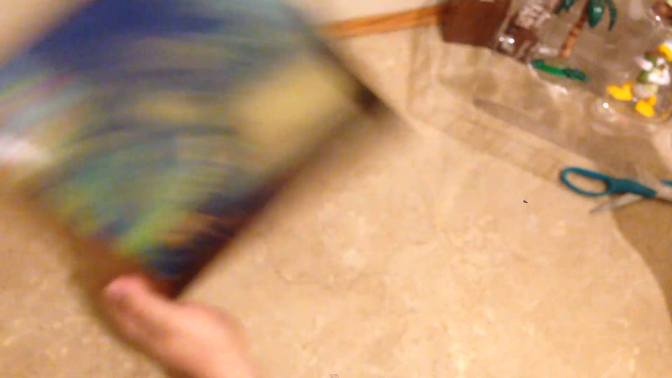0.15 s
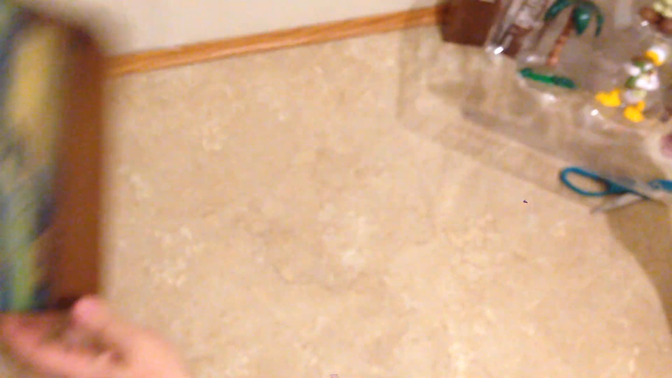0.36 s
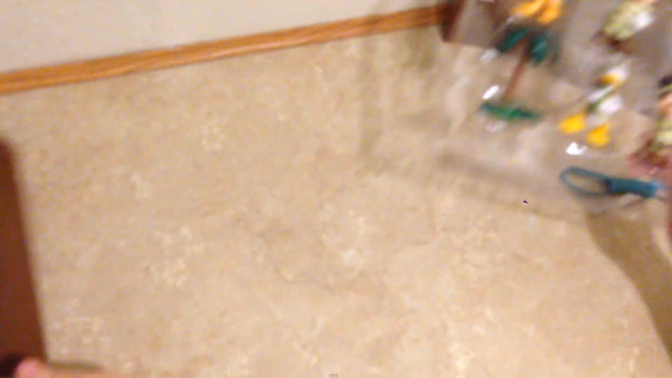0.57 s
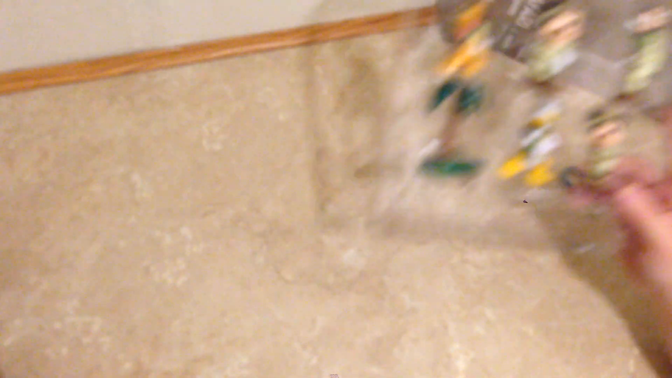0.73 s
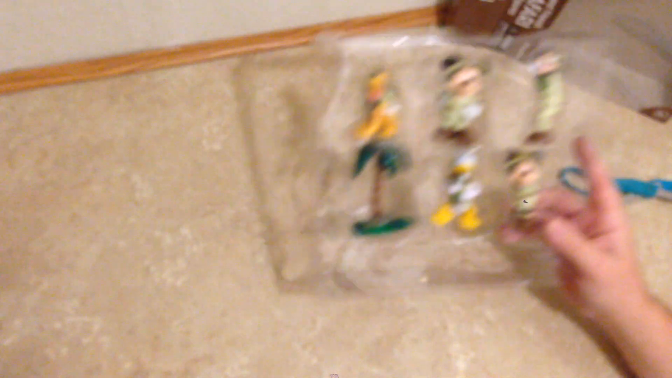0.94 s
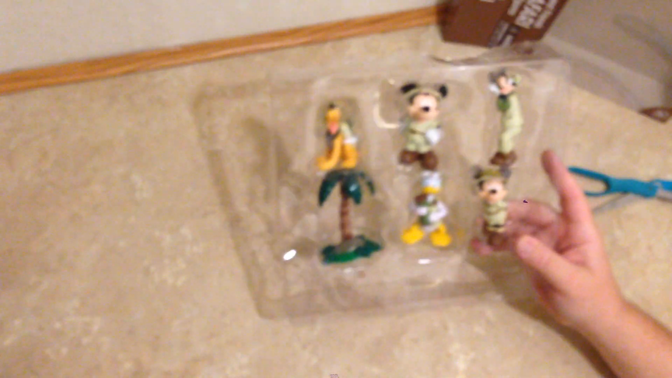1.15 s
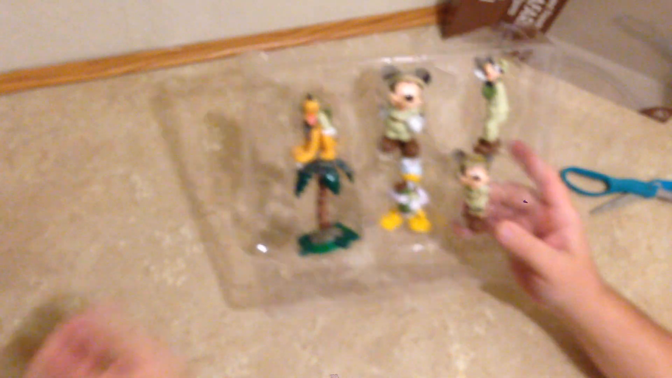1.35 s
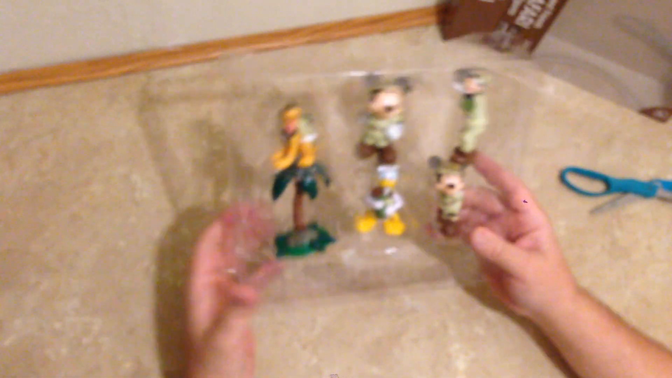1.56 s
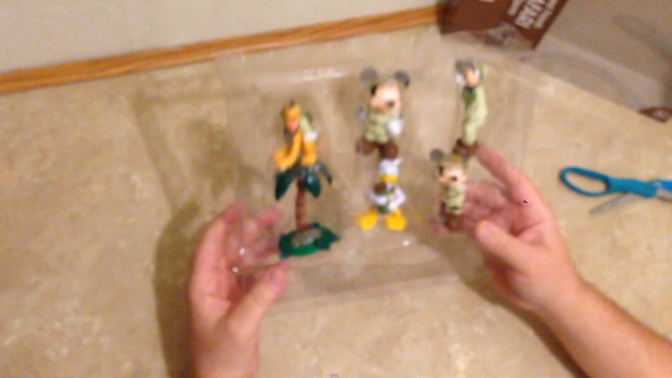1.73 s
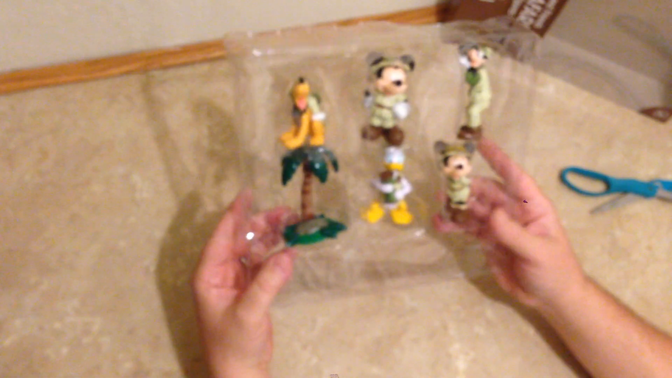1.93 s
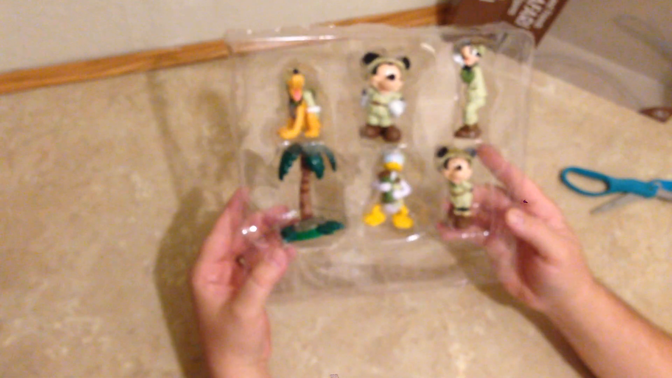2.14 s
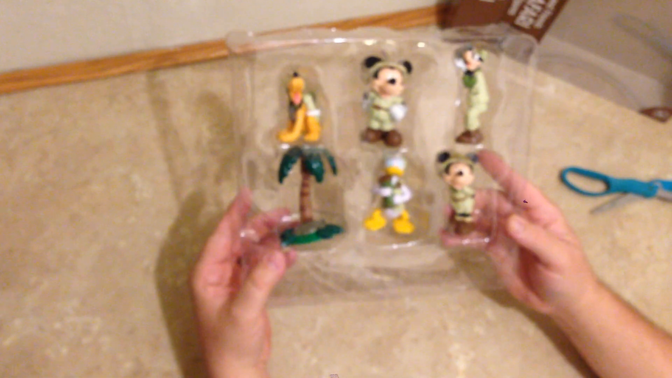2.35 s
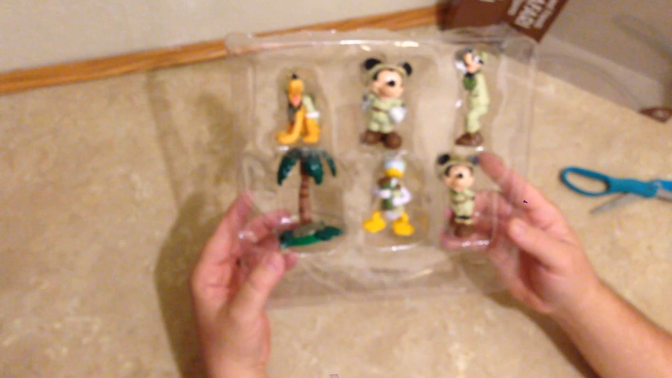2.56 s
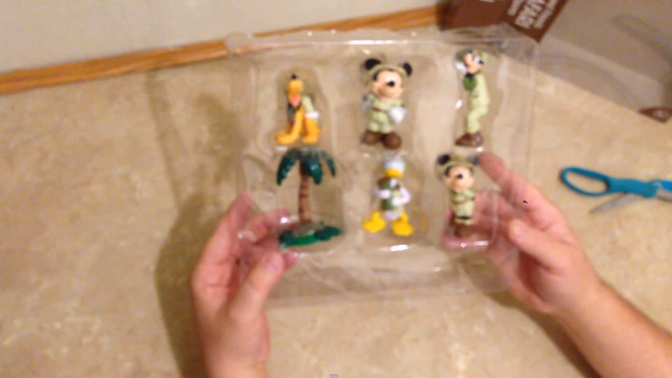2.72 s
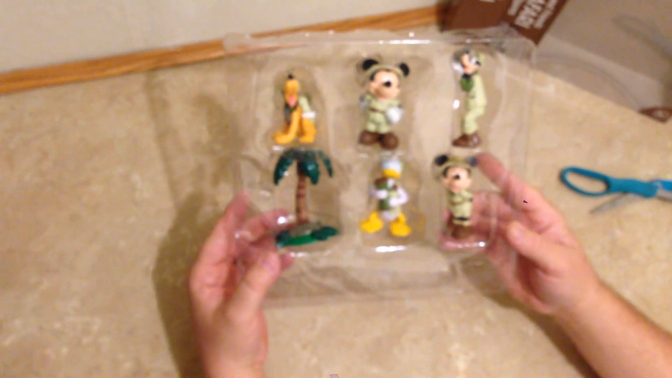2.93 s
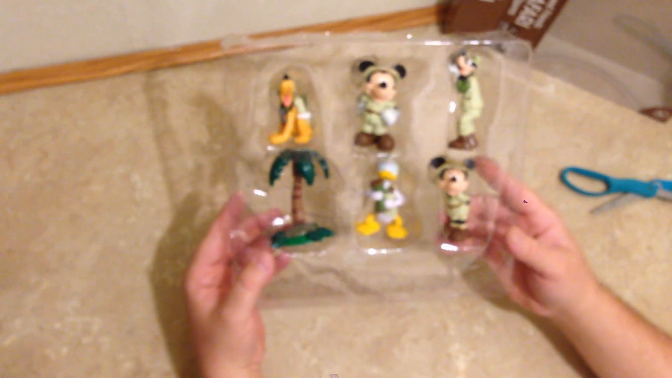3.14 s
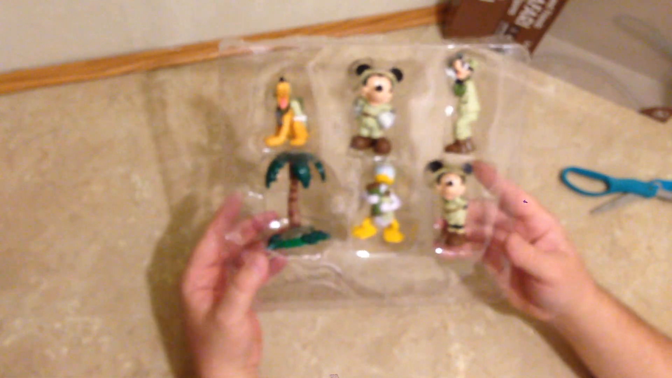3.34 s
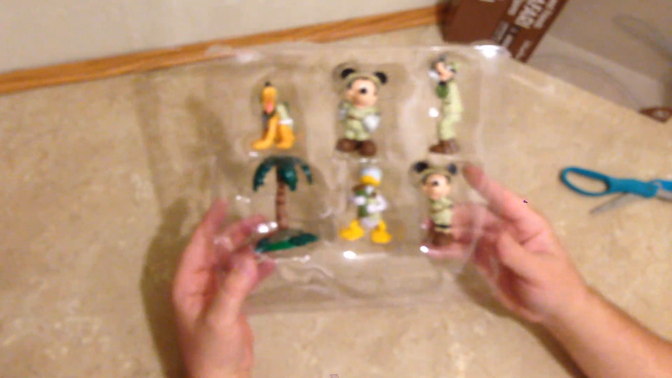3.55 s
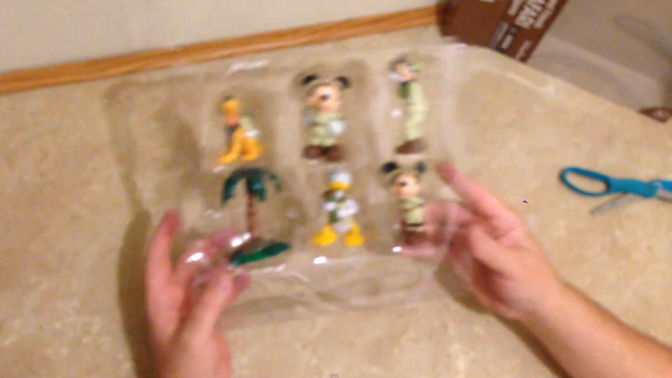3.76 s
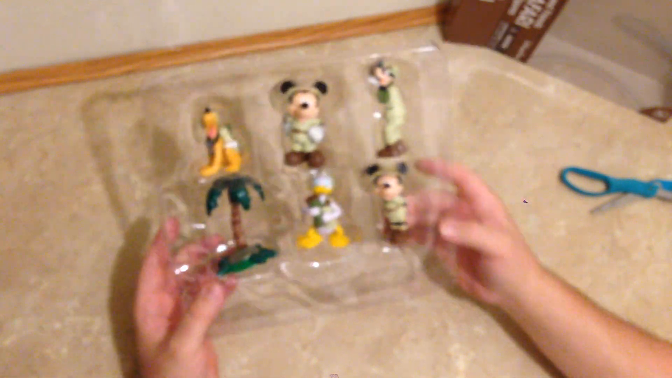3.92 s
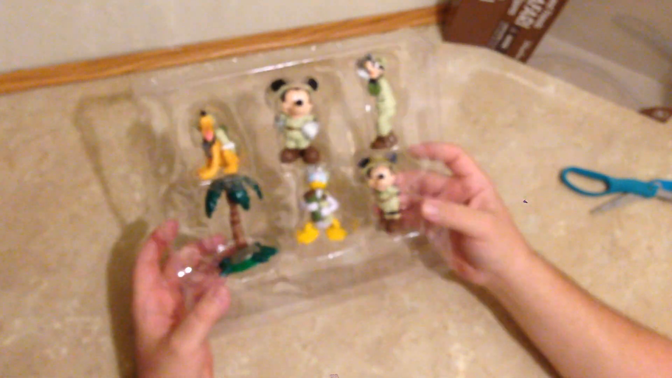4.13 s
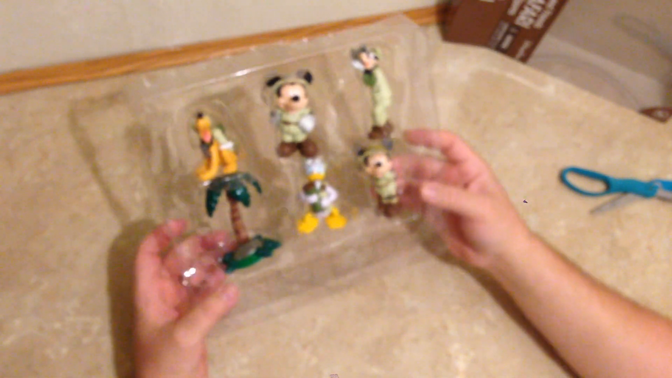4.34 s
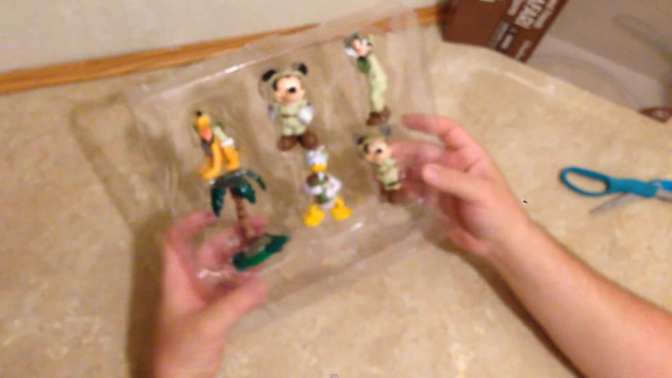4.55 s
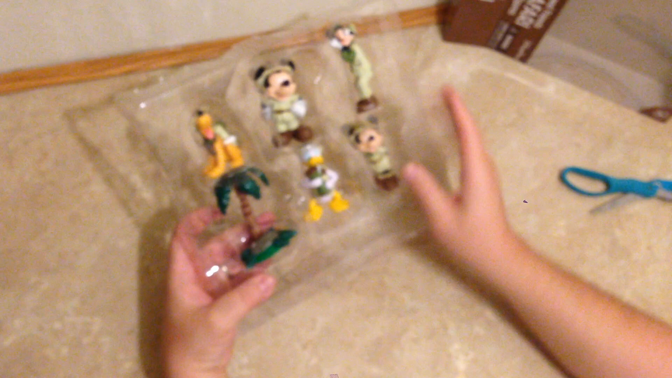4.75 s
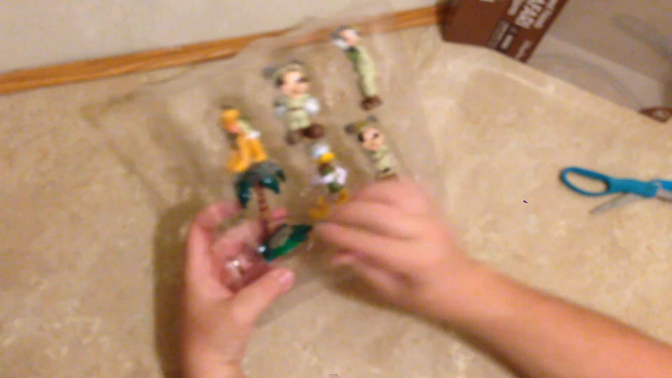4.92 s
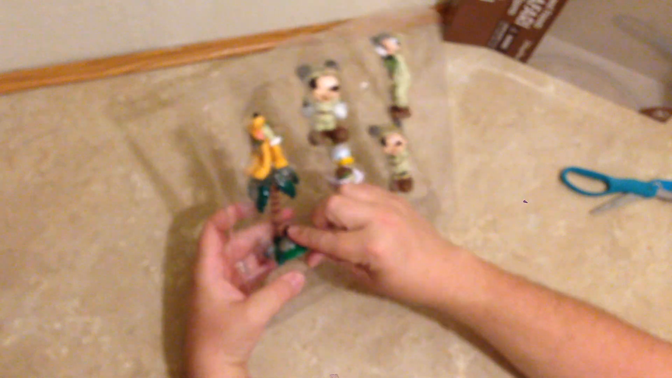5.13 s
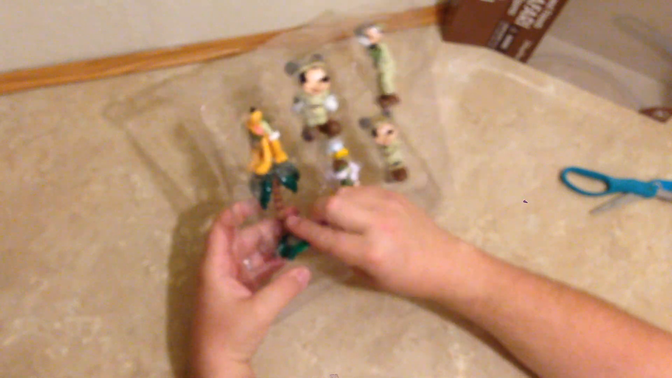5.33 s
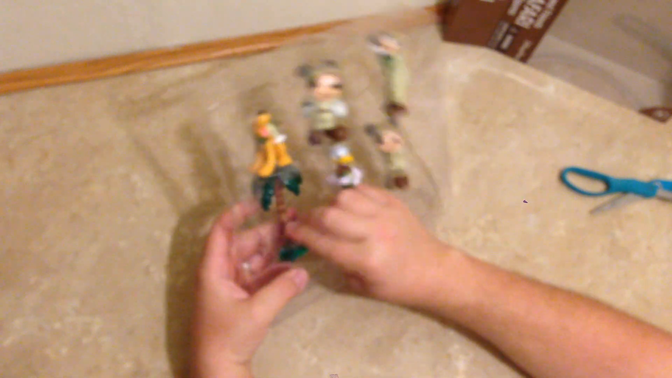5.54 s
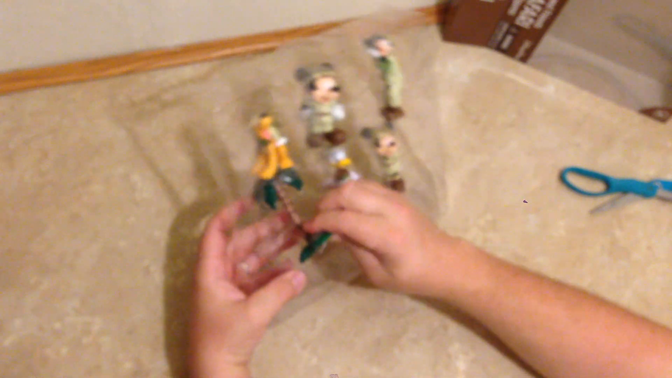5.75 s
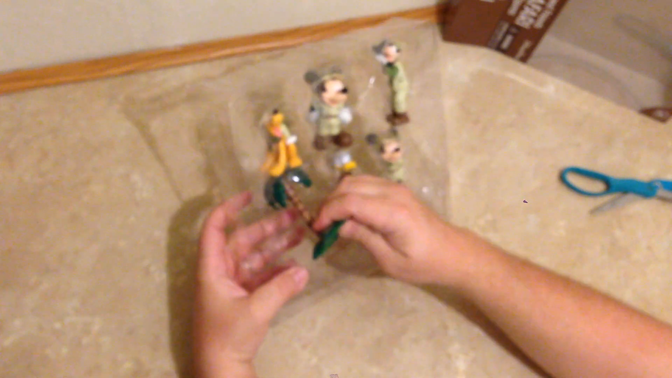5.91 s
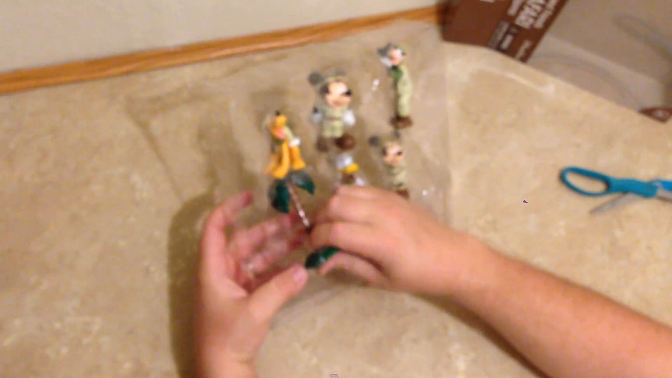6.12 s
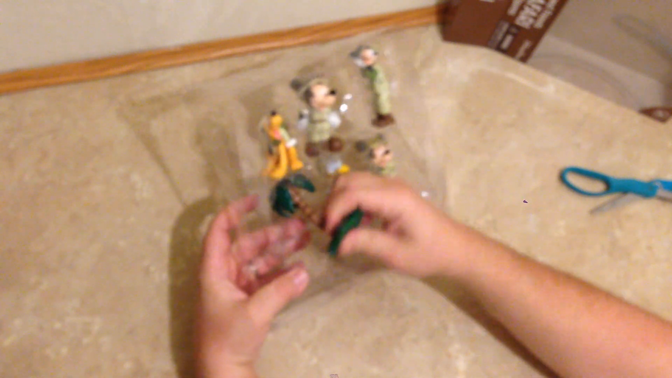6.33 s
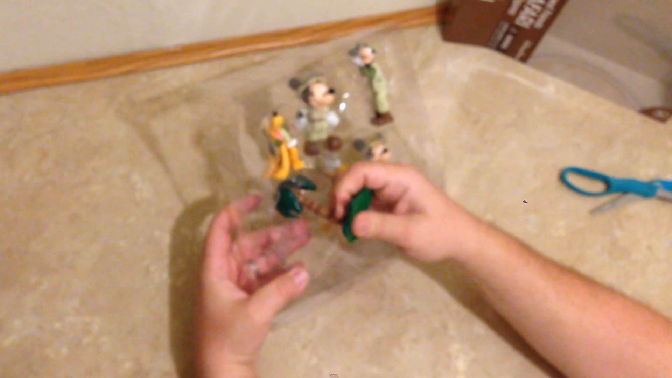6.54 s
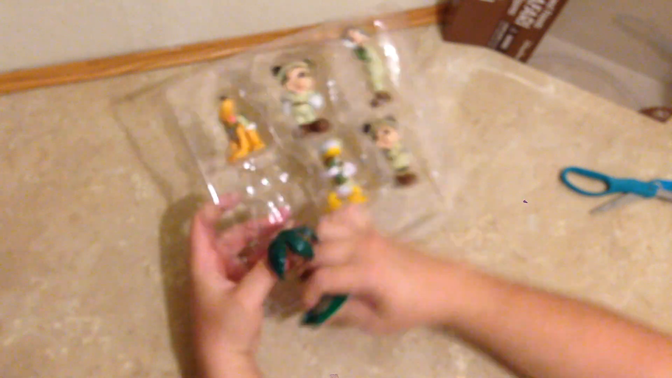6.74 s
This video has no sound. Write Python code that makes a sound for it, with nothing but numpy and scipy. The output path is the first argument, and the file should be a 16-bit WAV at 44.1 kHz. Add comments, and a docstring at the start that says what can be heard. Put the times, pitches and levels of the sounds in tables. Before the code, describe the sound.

A quiet small room holds soft low air noise, a wavering appliance hum and a very faint thin whine. From 0.2 seconds there is slight rustling. A cardboard box lands with a loud, hollow thud at 0.6 and a weaker one at 0.8, then a plastic tray of figures knocks down twice around 1.0. Thin plastic pops and crinkles from 1.5 to 2.3, with brief scrapes and a dull bump. It is nearly still until 3.5, when light crackles return around 3.7 to 3.8. Sparse clicks from 4.2 become sharper snaps at 4.6 to 4.9. From 5.1 fingers press harder: bright ticks, springy mid-pitched pops and rustle crowd together around 5.3 to 5.9. A strong pop comes at 6.1, more crackling from 6.25, and the loudest dense burst at 6.7 to 6.85. Close, with short room echoes.

```python
"""A plastic blister tray of toy figures is turned and pressed by fingers; its thin panels buckle and snap.
Buckles are decaying click bursts in bands around each panel's pitch, with tray thump and treble crack.
Grips rustle, crinkle and tick; scrapes are runs of stick-slip clicks; pocket resonances colour all of these.
Early on a cardboard box is knocked down on a countertop and the tray set beside it: damped modes and noise.
A small quiet room adds random echoes to each sound; an appliance hums and whines faintly over soft air noise."""
import sys
import numpy as np
from scipy import signal
from scipy.fft import rfft, irfft, next_fast_len
from scipy.io import wavfile
from scipy.ndimage import uniform_filter1d

SR = 44100
rng = np.random.default_rng(int(sys.argv[2]) if len(sys.argv) > 2 else 0)


def put_to_file(sound):
    """Save the sound as 16-bit audio at rate SR, in the file named by the first command-line argument."""
    columns = np.atleast_2d(sound).T  # one column per channel
    safe = np.clip(columns, -1, 1)
    whole_steps = np.round(safe * 32767)
    wavfile.write(sys.argv[1], SR, whole_steps.astype(np.int16))


N = 303408  # samples
T = np.arange(N) / SR  # s
RING_T = T[:SR // 3]  # time axis of one ring or echo tail, s


def undb(db):
    """Logarithmic level: decibels converted to an amplitude gain."""
    return 10 ** (np.asarray(db) / 20)


def level(x, db):
    """Mean power: scales a steady sound to an rms level."""
    return x * undb(db) / np.sqrt(np.mean(x ** 2))


def blow(x, db):
    """Impulse energy: gives a short sound the energy of 10 ms at a level."""
    window = 441  # samples in 10 ms
    return x * undb(db) * np.sqrt(window / np.sum(x ** 2))


def band(x, lo_hz, hi_hz, order):
    """Band limitation: causal Butterworth band-pass, its upper edge held below the Nyquist frequency."""
    edges = [lo_hz, min(hi_hz, 0.43 * SR)]
    return signal.sosfilt(signal.butter(order, edges, "band", fs=SR, output="sos"), x)


def colour(x, points):
    """Minimum-phase filtering: a folded cepstrum turns (Hz, dB) points into a causal response."""
    hz, db = np.transpose(points)
    size = next_fast_len(len(x) // 2 + 1) * 2
    freqs = np.arange(size // 2 + 1) * SR / size
    gain_db = np.interp(np.log(freqs + 1), np.log(hz), db)
    cepstrum = irfft(np.log(undb(gain_db)))
    cepstrum[1:size // 2] *= 2
    cepstrum[size // 2 + 1:] = 0
    response = np.exp(rfft(cepstrum))
    return irfft(rfft(x, size) * response)[:len(x)]


def walk(rate_hz):
    """Slow random fluctuation: smoothed steps of Gaussian values, with a spread near 1."""
    k = int(SR / rate_hz)
    steps = np.repeat(rng.standard_normal(N // k + 1), k)
    return uniform_filter1d(steps, k)[:N]


def fade(t60_s):
    """Exponential damping: the amplitude falls by 60 dB in t60."""
    return np.exp(-np.log(1000) * RING_T / t60_s)


def add(out, start_s, x):
    """Superposition: mixes a short sound in at its start time."""
    i = int(start_s * SR)
    out[i:i + len(x)] += x[:N - i]


def grains(rate_hz, spread_db, size):
    """Random impulse process: sparse tiny clicks of unequal size."""
    sizes = undb(spread_db * np.minimum(rng.exponential(size=size), 2))
    occurs = rng.random(size) < rate_hz / SR
    return occurs * sizes * rng.standard_normal(size)


def resonate(x, peaks, order):
    """Parallel resonators: sums (Hz, width Hz, dB) peaks; a higher order makes their skirts steeper."""
    out = 0
    for hz, width_hz, db in peaks:
        section = np.concatenate(signal.iirpeak(hz, hz / width_hz, fs=SR))
        out = out + undb(db) * signal.sosfilt([section] * order, x)
    return out


def room(x, wet_db, low_hz, t60_s=0.16, gap_s=0.0015):
    """Reverberation: counter and near walls give a few echoes that thicken into a new random tail per call."""
    density = np.clip(0.086 + (RING_T / 0.04) ** 2, 0, 1)
    occurs = rng.random(len(RING_T)) < density
    echoes = rng.standard_normal(len(RING_T)) * occurs / np.sqrt(density)
    tail = band(echoes * fade(t60_s) * (RING_T > gap_s), low_hz, 12800, order=1)
    response = undb(wet_db) * tail / np.sqrt(np.sum(tail ** 2))
    response[0] += 1  # direct sound
    return signal.fftconvolve(x, response)[:N]


# spectrum of the soft rumble and hiss, relative: frequency_hz [Hz], gain_db [dB]
AIR_COLOUR = [(15, -56), (25, -16), (110, -2.5), (169, -12), (193, -10.5), (274, -18.5), (421, -18),
              (848, -34), (1020, -28), (1170, -34), (1450, -29.5), (1800, -32.5), (2360, -32.5),
              (3260, -34), (15500, -38.5)]
# hum partials of the appliance: frequency_hz [Hz], level_db [dB rms]
HUM_PARTIALS = [(107.7, -61.5), (161.5, -58.5)]
# thin whine partials of the appliance: frequency_hz [Hz], level_db [dB rms]
WHINE_PARTIALS = [(1061, -78.5), (1297, -78.5), (1475, -76.5), (1943, -85), (2358, -82.5), (3009, -88)]


def background(waver_db=5.0):
    """Steady noise and tones: coloured air noise, with appliance sines wandering in phase and level."""
    noise = colour(rng.standard_normal(N), AIR_COLOUR)
    air = level(noise, -56.5) * undb(0.76 * walk(2.13))
    hum = np.zeros(N)
    for hz, db in HUM_PARTIALS:
        tone = np.sin(2 * np.pi * hz * T + 1.77 * walk(17.0))
        hum += level(tone * undb(waver_db * walk(4.1)), db)
    whine = np.zeros(N)
    for hz, db in WHINE_PARTIALS:
        tone = np.sin(2 * np.pi * hz * T + 0.5 * walk(7.2))
        whine += level(tone * undb(walk(0.63)), db)
    return air + hum + whine


# broad resonances of the moulded pockets: frequency_hz [Hz], width_hz [Hz], gain_db [dB]
POCKET_PEAKS = [(332, 81, -8.5), (742, 410, -6), (1010, 250, -17.5), (1600, 260, -13), (2028, 160, -4),
                (4020, 950, -8.5)]


def pockets(x, direct_db=-1.0):
    """Sympathetic resonance: the moulded pockets ring along with whatever happens to the tray."""
    return undb(direct_db) * x + resonate(x, POCKET_PEAKS, order=1)


# rustle spectrum, relative: frequency_hz [Hz], gain_db [dB]
RUSTLE_SPECTRUM = [(100, -24), (180, 2.5), (245, 13), (325, 5), (480, 10.5), (1000, 3.5), (2100, 3.5),
                   (4000, -3.5), (6500, -13), (12000, -65)]
# fingers grip and turn the tray: start_s [s], length_s [s],
# gain_db [dB, drives rubbing and ticks], fine_db [dB, extra gain of the crinkle]
HAND_GRIPS = [(0.238, 0.6, -65.5, -10), (0.831, 0.19, -58.5, -0.5), (1.708, 0.14, -51.5, -8),
              (1.887, 0.093, -52.5, -3), (2.028, 0.07, -56, -14), (2.167, 0.065, -55, -7),
              (3.509, 0.06, -65, -1), (3.704, 0.14, -61.5, 2), (3.92, 0.8, -60.5, -6.5),
              (4.65, 0.27, -57, -2), (4.953, 0.18, -63, 2), (5.114, 0.16, -48, -14), (5.34, 0.073, -48, 9),
              (5.459, 0.1, -42.5, -2), (5.643, 0.32, -45.5, -9), (6.012, 0.21, -51, -12),
              (6.288, 0.2, -40, -1.5), (6.505, 0.14, -51.5, -1), (6.72, 0.2, -38.5, 5)]


def rubbing(rustle_db=-5, crinkle_db=-6, patchy_db=-3.5, attack_s=0.0067, release_s=0.034):
    """Stick-slip friction: skin and figures slip on the plastic, and its creases tick."""
    slips = np.zeros(N)
    for hz in 100 * 2 ** np.arange(7):
        # as the contact moves, one pocket after another picks up the slips
        octave = band(grains(1500, 5.9, N), hz, 2 * hz, order=2)
        slips += octave * undb(patchy_db * walk(43))
    rustle = level(colour(slips, RUSTLE_SPECTRUM), rustle_db)
    crinkle = level(band(grains(700, 7.5, N), 3130, 8100, order=1), crinkle_db)
    out = np.zeros(N)
    for start_s, length_s, gain_db, fine_db in HAND_GRIPS:
        # a grip tightens, holds and lets go
        tighten = (T - start_s) / attack_s
        let_go = 1 - (T - start_s - length_s) / release_s
        pressure = np.clip(np.minimum(tighten, let_go), 0, 1)
        out += undb(gain_db) * pressure * (rustle + undb(fine_db) * crinkle)
    return room(out, wet_db=1.0, low_hz=202)


def panel(x, hz, octaves):
    """Plate radiation: passes a band around the pitch; small stiff panels sound purer than large ones."""
    typical_hz, narrowing = 1450, 0.66  # narrowing: octaves of width lost per octave of pitch
    width = max(octaves - narrowing * np.log2(hz / typical_hz), 0.5)
    spread = 2 ** (width / 2)
    return band(x, hz / spread, hz * spread, order=2)


# slow flexing of the whole tray: frequency_hz [Hz], width_hz [Hz, per filter stage], gain_db [dB]
TRAY_FLEX = [(197, 52, -2.5), (312, 93, 2), (585, 210, -14)]


def snap(db, hz, thump_db, crack_db, decay_ms, grit_db=2.0, thump_ms=10, rise=0.22, ring_db=-3, ring_width=0.5):
    """Snap-through buckling: a panel pops, creases run on as tiny clicks, and the whole tray flexes."""
    ms = 1000 * T[1:SR // 12]
    clicks, sizes, push = rng.standard_normal((3, len(ms)))
    decay_ms = max(decay_ms, 0.1)
    # a long crumple also takes longer to get going
    swell = (1 - np.exp(-ms / (rise * decay_ms))) * np.exp(-ms / decay_ms)
    burst = clicks * undb(grit_db * np.clip(sizes, -2, 2)) * swell
    # a snap that shakes the tray wakes the neighbouring panels: octaves of width gained per dB of thump
    octaves = 2.92 + 0.031 * thump_db
    broad = blow(panel(burst, hz, octaves), 0)
    # the panel rings on for a few cycles at its own pitch
    narrow = 1 + ring_width / 2
    ring = blow(band(burst, hz / narrow, hz * narrow, order=1), ring_db)
    crack = blow(band(burst, 2640, 8700, order=1), crack_db)
    thump = blow(resonate(push * np.exp(-ms / thump_ms), TRAY_FLEX, order=2), thump_db)
    struck = blow(broad + ring, 0) + crack + thump
    return undb(db) * room(struck, wet_db=-3.5, low_hz=202)


def ticks(count=4):
    """Random creasing: small creases give way around the middle of each grip, louder under a firmer hand."""
    out = np.zeros(N)
    for start_s, length_s, gain_db, _ in HAND_GRIPS:
        for when, size, pitch in rng.triangular(-1, 0, 1, (count, 3)):
            tick_s = min(start_s + length_s * (1 + when) / 2, T[-1])
            hz = 2000 * 2 ** (0.39 * pitch)  # scatter in octaves
            db = gain_db - 3 + 5 * size
            add(out, tick_s, snap(db, hz, thump_db=-15, crack_db=-16, decay_ms=2.28))
    return out


# panels that buckle loudly: start_s [s], level_db [dB, panel sound before room and pockets],
# pitch_hz [Hz], thump_db and crack_db [dB re level], decay_ms [ms, time constant, at least 0.1 is used]
PANEL_SNAPS = [(0.294, -66, 1400, 5, 8, 7), (0.8387, -48.5, 1700, 0, -9, 15),
               (0.8871, -47.5, 2000, -22, -11, 0.93), (0.9725, -58.5, 4250, -7, -3, 1.5),
               (1.5056, -38.5, 1470, -32, -44, 5.2), (1.531, -35.5, 1400, -8, -10.5, 3.2),
               (1.683, -38, 1430, 3, -25, 15), (1.7867, -33.5, 1350, -4.5, -32, 7.8),
               (1.8094, -34, 1860, -17, -17, 1.6), (1.8735, -59.5, 2500, -18, 19, 3),
               (1.9518, -43, 1430, -36, 5.5, 3), (2.0274, -34.5, 2170, -9, -33, 6.9),
               (2.036, -39, 570, 3, -18, 5.3), (2.1751, -45.5, 1080, 1.5, -5.5, 13),
               (2.3336, -56, 1235, -1, -42, 2.2), (3.6995, -49.5, 1950, -10.5, -3.5, 8.4),
               (3.745, -47.5, 1500, -22, -28, 2.2), (3.803, -41, 1640, -5.5, -10, 12.6),
               (4.1661, -49.5, 1020, -4.5, -28, 2.4), (4.1892, -46.5, 774, -47, -35, 4),
               (4.354, -48, 1260, 0.5, -13, 8.7), (4.4341, -37, 1020, -9.5, -20, 5.3),
               (4.57, -44, 1010, -14, -30, 2.1), (4.6435, -30.5, 1670, -9, -11.5, 12.5),
               (4.6831, -35.5, 2120, -5.5, -11, 12), (4.7298, -46, 1730, 1.5, 9, 7.6),
               (4.7606, -38, 4700, -36, -12, 0.97), (4.8346, -28.5, 1350, -9, -14, 2.6),
               (4.857, -33, 865, -2, -15, 2), (4.9391, -42, 2670, -25, -7, 3),
               (4.966, -57.5, 3770, -21, 15, 2.3), (5.03, -36.5, 1080, -1.5, -14, 11),
               (5.1078, -40.5, 1160, -10, -23, 10), (5.1422, -39, 1670, -6.5, -2.5, 8.3),
               (5.2056, -46, 1490, -16, 11.5, 1), (5.2402, -53.5, 885, 10, 8, 3.7),
               (5.305, -33, 1940, -15, -23, 5.4), (5.336, -33.5, 5050, -26, -5, 0.85),
               (5.34, -30, 2080, -2, -11, 5.7), (5.3742, -27, 1440, -9.5, -10, 2.6),
               (5.404, -24.5, 4140, -8.5, -23, 0.072), (5.4463, -23.5, 1380, -3.5, -30, 6.5),
               (5.4885, -36, 1770, -4.5, -2, 5.7), (5.5101, -31, 1490, -11, -8, 7.4),
               (5.5848, -31, 2840, -43, -15, 3.4), (5.643, -28, 1560, -67, -35, 8.4),
               (5.6544, -28.5, 1670, -37, -37, 2), (5.6618, -27.5, 2010, -19, -39, 2.8),
               (5.6895, -36, 2820, -17, -25, 2.7), (5.707, -34.5, 1960, -5, -33, 0.86),
               (5.7256, -26, 1760, -15, -16, 2.3), (5.7369, -36, 1740, -9, 2.5, 4.7),
               (5.7896, -37.5, 2110, -20, -25, 1.3), (5.8114, -39.5, 2460, -8, -7, 3.1),
               (5.8458, -33.5, 2250, -22, -38, 2.1), (5.924, -33.5, 1550, 1, -20, 4.6),
               (5.9386, -35, 1240, -8, -3.5, 6.3), (6.098, -17.5, 1450, -21, -47, 3.4),
               (6.0152, -47, 3000, -20, -14, 2.5), (6.257, -33.5, 2090, -33, -44, 3.7),
               (6.274, -31.5, 2000, -10, -9, 1.8), (6.2913, -25.5, 1320, -4.5, -9, 2.7),
               (6.3402, -24, 1780, -20, -5.5, 4.9), (6.3773, -34, 610, 4.5, -4, 2.8),
               (6.3921, -31.5, 1790, -12, -30, 6.4), (6.4406, -29, 1450, -7, -10.5, 2.1),
               (6.466, -36, 1760, -23, -0.5, 3.3), (6.5087, -35.5, 2480, -22.5, 4.5, 6.4),
               (6.57, -29.5, 1920, -17, -18, 2), (6.5866, -37.5, 2440, -8, -0.5, 4.9),
               (6.6051, -31, 2400, -16, -33, 2.1), (6.677, -36, 1640, -35, -42, 4),
               (6.699, -26.5, 1870, -21, -0.5, 13), (6.7287, -17.5, 1900, -13, -4, 5.6),
               (6.7503, -19.5, 1970, -4.5, -3, 2.9), (6.757, -22, 1500, -24, -3, 9),
               (6.7746, -17, 1720, -9.5, -9, 7.5), (6.8204, -23.5, 1370, -7, -30, 4.9),
               (6.847, -30, 2100, -4, -25, 2.3)]


def snaps():
    """Elastic instability: the panels that buckle loudly, one snap per row."""
    out = np.zeros(N)
    for start_s, *row in PANEL_SNAPS:
        add(out, start_s, snap(*row))
    return out


# card, figures and fingertips scrape: middle_s [s], level_db [dB, before room and pockets],
# pitch_hz [Hz], half_length_ms [ms, Gaussian spread]
SCRAPE_RUNS = [(0.613, -48.5, 655, 3.6), (0.86, -44.5, 3340, 23), (1.502, -46, 2400, 5.4),
               (1.679, -47, 1500, 7.5), (1.77, -44, 2800, 26), (1.945, -41, 1640, 14),
               (2.221, -48, 1900, 6.8), (3.773, -43, 3950, 40), (4.432, -44.5, 1740, 19),
               (4.643, -39, 1950, 12), (4.708, -35.5, 1930, 14), (4.824, -45, 1520, 5.1),
               (4.878, -42.5, 1595, 11), (5.195, -36.5, 2070, 14), (5.633, -36, 2460, 5.1),
               (5.906, -37.5, 2340, 6.1), (6.693, -45, 1980, 2.1)]


def scrapes(rate_hz=2200, spread_db=6.0):
    """Stick-slip friction: quick runs of slips swell and die away, heard through a panel."""
    out, t = np.zeros(N), T[:SR // 5]
    middle = t.mean()
    for middle_s, db, hz, half_ms in SCRAPE_RUNS:
        swell = np.exp(-(1000 * (t - middle) / half_ms) ** 2 / 2)
        slips = grains(rate_hz, spread_db, len(t)) * swell
        scrape = blow(panel(slips, hz, octaves=2.22), db)
        add(out, middle_s - middle, room(scrape, wet_db=-8.5, low_hz=202))
    return out


# dense higher modes of card and plastic, relative: frequency_hz [Hz], gain_db [dB]
KNOCK_SPECTRUM = [(150, -20), (400, 6.5), (900, 5.5), (1400, -1.5), (1950, -5), (3600, 0.5), (6000, -2.5),
                  (15000, -3.5)]


def knocks(table, modes, slap_db, grain_db, slap_t60_s=0.038, grain_t60_s=0.15):
    """Modal impact: a blow slaps the sheet and rings its modes; a softer contact leaves the high ones out."""
    out = np.zeros(N)
    for start_s, db, contact_hz in table:
        ring = np.zeros(len(RING_T))
        for hz, mode_db, t60_s in modes:
            # all modes start together, each a little differently every time
            detuned_hz = hz * (1 + 0.0082 * rng.standard_normal())
            phase = 1.53 * rng.standard_normal()
            ring += undb(mode_db) * fade(t60_s) * np.sin(2 * np.pi * detuned_hz * RING_T + phase)
        slap = colour(rng.standard_normal(len(RING_T)) * fade(slap_t60_s), KNOCK_SPECTRUM)
        grain = colour(rng.standard_normal(len(RING_T)) * fade(grain_t60_s), KNOCK_SPECTRUM)
        struck = blow(ring, 0) + blow(slap, slap_db) + blow(grain, grain_db)
        softened = signal.sosfilt(signal.butter(2, contact_hz, fs=SR, output="sos"), struck)
        # a light object radiates no deep bass
        radiated = band(softened, 110, 18000, order=3)
        add(out, start_s, room(blow(radiated, db), wet_db=-2.5, low_hz=500))
    return out


# the box hits the counter: start_s [s], level_db [dB, before room], contact_hz [Hz, low-pass cut-off]
BOX_BLOWS = [(0.6168, -13, 1190), (0.7905, -19.5, 980)]
# what the box rings with: frequency_hz [Hz], gain_db [dB, relative], t60_s [s]
BOX_RING = [(111, -3, 0.11), (128, -13, 0.17), (161, -1, 0.063), (196, -1, 0.099), (331, -9.5, .18),
            (342.7, 5, 0.12), (380.7, 0, 0.17), (426, -3.5, 0.15), (466, -14, 0.19), (569, -11.5, 0.1),
            (620, -3.5, 0.15), (690, -27, 0.11), (841, -6.5, 0.088), (931, -3, 0.076), (980, -13, 0.14),
            (1370, -8, 0.16)]


def box_knocks():
    """Modal impact of a card box: ring and slap equally strong, with a weaker grainy tail."""
    return knocks(BOX_BLOWS, BOX_RING, slap_db=0, grain_db=-6)


# the loaded tray meets the counter or the hand: start_s [s], level_db [dB, before room],
# contact_hz [Hz, low-pass cut-off]
TRAY_BLOWS = [(0.9988, -20, 1350), (1.0425, -20.5, 1600), (1.195, -44, 2700), (1.555, -31.5, 960),
              (2.254, -48.5, 1200), (4.838, -33.5, 397), (4.94, -46, 300), (6.378, -49, 600)]
# what the tray rings with: frequency_hz [Hz], gain_db [dB, relative], t60_s [s]
TRAY_RING = [(119, -18, 0.33), (155.4, 3, 0.17), (194, -1.5, 0.19), (244, -7.5, 0.2), (367.6, -12, 0.19),
             (600, 2, 0.058), (740, -16, 0.26), (876, -0.5, 0.056), (1002, -7, 0.12), (1356, 2.5, 0.045),
             (1560, -18, 0.18)]


def tray_knocks():
    """Modal impact of a loaded plastic tray: a weak slap under a strong grainy tail."""
    return knocks(TRAY_BLOWS, TRAY_RING, slap_db=-7.5, grain_db=1.5)


def scene():
    """Superposition of box and tray on the counter, in the room."""
    plastic = pockets(rubbing() + ticks() + snaps() + scrapes())
    return (background() + plastic + box_knocks() + tray_knocks())[None]


def record(dry):
    """Band limitation: a steep zero-phase elliptic low-pass cuts the top."""
    top_hz = 15600
    return signal.sosfiltfilt(signal.ellip(8, 0.1, 60, top_hz, fs=SR, output="sos"), dry)


dry = scene()
out = record(dry)
put_to_file(out)
```